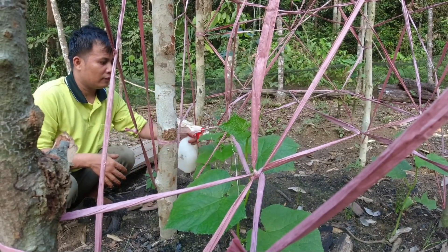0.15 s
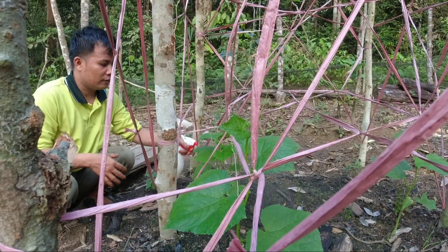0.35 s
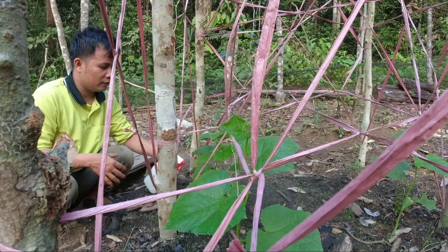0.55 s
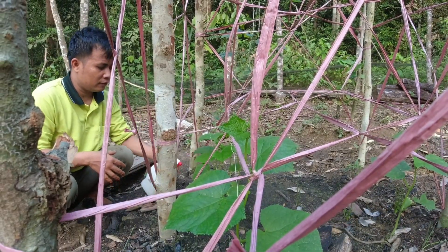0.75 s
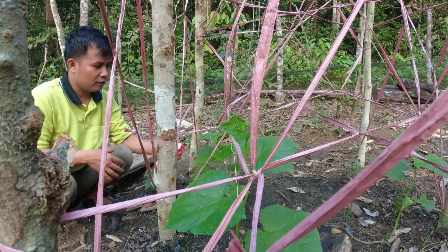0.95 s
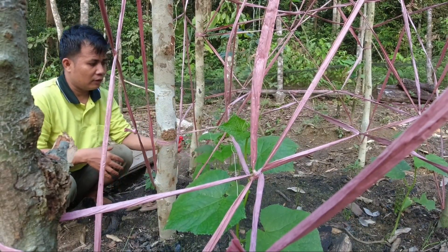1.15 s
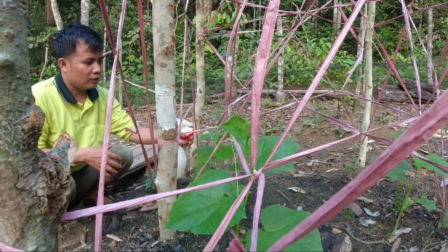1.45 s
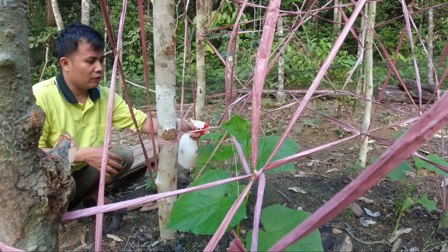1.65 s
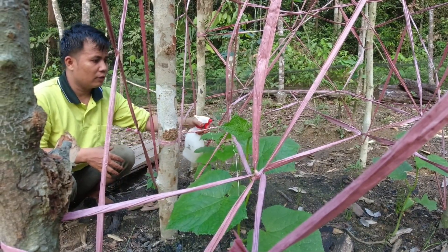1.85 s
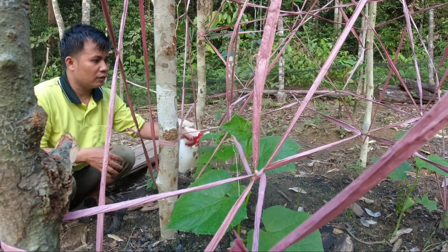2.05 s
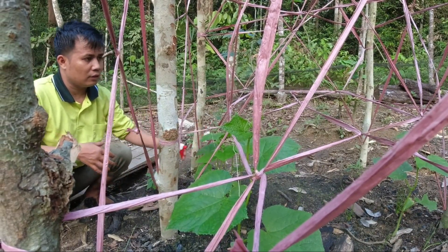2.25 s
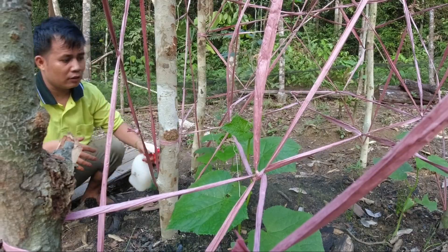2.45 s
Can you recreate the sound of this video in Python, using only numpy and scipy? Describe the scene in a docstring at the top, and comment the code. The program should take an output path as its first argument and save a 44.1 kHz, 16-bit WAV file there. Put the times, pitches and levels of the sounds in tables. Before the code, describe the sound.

A plastic hand sprayer close to the microphone gives eight short, raspy, hissing squirts at a steady quick pace, trigger clicking between them; faint insects, soft outdoor air and a low distant engine throb lie behind.

```python
"""Ticks of a plastic trigger are heard at once, over insects, garden air and the throb of a far engine.
A spray bottle is pumped eight times in a wooded garden, with ticks before, between and after the strokes.
On each stroke the piston slips and rubs, ringing the hollow pump head, and shaped noise hisses and whistles
as mist. Ticks are short rings, gurgles and a faint rustle are resonant grains; trunks and ground echo
the bottle. Insects are narrow throbbing noise, the engine is five wavering sine orders."""
import sys
import numpy as np
from scipy import signal
from scipy.io import wavfile

SR = 44100
rng = np.random.default_rng(int(sys.argv[2]) if len(sys.argv) > 2 else 0)


def ratio(d):
    """dB to gain"""
    e = np.asarray(d, float) / 20
    return 10 ** e


def wrap_up_sound(samples):
    """Save the sound to the file named by the first command line argument, as 16-bit audio."""
    columns = np.atleast_2d(samples).T
    # keep every value between -1 and 1, then stretch to whole-number steps
    tamed = np.clip(columns, -1, 1)
    steps = np.round(tamed * 32767).astype(np.int16)
    wavfile.write(sys.argv[1], SR, steps)


N = 114660


def rms_one(x):
    """Scale to rms 1."""
    return x / np.sqrt(np.mean(x ** 2) + 1e-20)


def in_time(rows):
    """Columns after the first (seconds), joined by straight lines over the scene."""
    seconds, *columns = np.transpose(rows)
    return [np.interp(np.arange(N) / SR, seconds, column) for column in columns]


def drift(rate_hz):
    """Random wander of rms 1: noise smoothed by two equal low-pass poles at rate_hz."""
    every = 40  # samples between drawn points
    settle = 2000  # points dropped while the filter settles
    r = np.exp(-2 * np.pi * rate_hz * every / SR)
    points = rng.standard_normal(N // every + settle + 2)
    slow = signal.lfilter([1], [1, -2 * r, r * r], points)[settle:]
    return np.interp(np.arange(N) / every, np.arange(len(slow)), rms_one(slow))


def resonate(x, hz, width_hz):
    """Two-pole resonance with gain of about 1 at its peak."""
    r = np.exp(-np.pi * width_hz / SR)
    feedback = [1, -2 * r * np.cos(2 * np.pi * hz / SR), r * r]
    return signal.lfilter([(1 - r * r) / 2, 0, (r * r - 1) / 2], feedback, x + 1e-18)


def twice(x, hz, width_hz):
    """The same resonance applied twice, for steeper skirts."""
    return resonate(resonate(x, hz, width_hz), hz, width_hz)


def butter(x, order, hz, kind):
    """Butterworth filter."""
    return signal.sosfilt(signal.butter(order, hz, kind, fs=SR, output="sos"), x)


def coloured(spectrum, patchy_db):
    """Third-octave bands of noise, each with its own level and flicker; rms 1."""
    out = 0
    edges = 20 * 2 ** np.arange(0, 9.9, 1 / 3)
    white = rng.standard_normal((2, N))  # neighbouring bands take separate noises
    table_hz, table_db = np.transpose(spectrum)
    for k, (low, high) in enumerate(zip(edges, edges[1:])):
        band = butter(white[k % 2], 2, [low, high], "band")
        band_db = np.interp(np.log(low * high) / 2, np.log(table_hz), table_db)
        out = out + band * ratio(band_db + patchy_db * drift(8.1))
    return rms_one(out)


# Trigger strokes close to the microphone. Each row: start in seconds, length in seconds, rasp level in dB,
# lower and upper resonance in Hz, upper over lower resonance in dB, peak of the bottle thump in dB.
PISTON_STROKES = [(0.208, 0.13, -28, 2118, 2790, -1.5, -56.5), (.49, 0.13, -27, 2174, 2610, 0, -47.5),
                  (0.767, 0.13, -30.5, 1850, 2600, -1.5, -48.5), (1.03, 0.13, -30.5, 2270, 2790, -8.5, -52),
                  (1.302, .125, -27.5, 2110, 2693, -3.5, -55.5), (1.61, 0.13, -28, 2067, 2727, -0.5, -50),
                  (1.928, 0.13, -25, 1890, 2576, 5, -58.5), (2.219, 0.11, -27, 2045, 2600, 0, -53.5)]
# Other resonances of the hollow pump head. Each row: centre in Hz, width in Hz, level in dB.
HEAD_RESONANCES = [(955, 770, -16.5), (1310, 240, -12), (1600, 450, -9), (3730, 1750, -18)]


def piston():
    """The seal slips in dense uneven jerks over a rubbing noise; the pump head rings, the bottle thumps."""
    slips_per_s, slip_spread_db = 500, 2.5
    rub_db, rasp_swell_db = 4, 1.2  # rub relative to the slips
    lower_width_hz, upper_width_hz, head_low_cut_hz = 380, 480, 760
    rise_s, fall_s, tail_s, tail_db = 0.022, 0.029, 0.074, -35
    thump_hz, thump_lead_s, thump_s = 270, 0.015, 0.008

    t, out = np.arange(N) / SR, np.zeros(N)
    slip_size = ratio(slip_spread_db * np.minimum(rng.exponential(1, N), 3))
    slip_happens = rng.random(N) < slips_per_s / SR
    slips = slip_size * rng.choice([-1, 1], N) * slip_happens
    force = rms_one(slips) + ratio(rub_db) * rng.standard_normal(N)
    force = force * ratio(rasp_swell_db * drift(45))
    for start, length, db, low_hz, high_hz, high_db, thump_db in PISTON_STROKES:
        span = slice(int((start - 0.06) * SR), int((start + length + 0.2) * SR))
        u = t[span] - start
        push_force = force[span]
        body = ratio(high_db) * twice(push_force, high_hz, upper_width_hz)
        body = body - twice(push_force, low_hz, lower_width_hz)
        for k, (hz, width_hz, head_db) in enumerate(HEAD_RESONANCES):
            body = body + (-1) ** k * ratio(head_db) * twice(push_force, hz, width_hz)
        body = butter(body, 2, head_low_cut_hz, "high")

        # S-shaped onset and release, with a faint dying tail
        rise = 1 / (1 + np.exp(-(u - rise_s / 2) / (rise_s / 4)))
        fall = 1 / (1 + np.exp((u - length + fall_s / 2) / (fall_s / 4)))
        tail = ratio(tail_db) * np.exp(-np.maximum(u - length, 0) / tail_s)
        out[span] += ratio(db) * rise * (fall + tail) * rms_one(body)

        push = np.maximum(u + thump_lead_s, 0) / thump_s
        thump_shape = np.e * push * np.exp(-push)  # crest of 1
        out[span] += ratio(thump_db) * thump_shape * np.sin(2 * np.pi * thump_hz * u)
    return out


# Spurts of mist from the nozzle. Each row: start in seconds, length in seconds, hiss level in dB,
# whistle level in dB, whistle pitch in Hz, extra treble of the hiss in dB.
MIST_SPURTS = [(0.216, 0.11, -32.5, -43.5, 8300, 0), (0.499, 0.1, -34.5, -44, 8260, 0.5),
               (0.787, 0.12, -35, -45.5, 8300, -4.5), (1.042, 0.12, -36, -39, 8090, 4),
               (1.319, 0.11, -37, -42, 8120, 3.5), (1.616, 0.13, -35, -46, 8460, -1.5),
               (1.94, 0.12, -30.5, -38.5, 8920, 5.5), (2.225, 0.1, -31.5, -45, 8570, -4)]
# Colour of the hiss. Each row: frequency in Hz, relative density in dB per Hz.
MIST_COLOUR = [(1500, 0), (3000, 20), (4500, 16.5), (6300, 15), (7300, 7), (9000, 2), (10400, -76),
               (12000, -65.5), (13500, 7.5), (15000, 15.5), (16500, -3)]


def mist():
    """Pressure builds to a crest and sags; the jet hisses brightly and whistles faintly."""
    crest_share, edge_db = 0.48, -17  # place of the crest in the spurt; level at its edges
    open_s, tail_s, whistle_width_hz = 0.014, 0.032, 1050
    bandstop_hz, bandstop_width_hz, treble_hz = 10400, 1500, 11500

    t, out = np.arange(N) / SR, np.zeros(N)
    hiss, white = coloured(MIST_COLOUR, patchy_db=3.0), rng.standard_normal(N)
    # a band-stop leaves a hole in what is heard around 10.4 kHz; it is no trait of the spray
    hole_edges = [bandstop_hz - bandstop_width_hz / 2, bandstop_hz + bandstop_width_hz / 2]
    hiss = butter(hiss, 2, hole_edges, "bandstop")
    treble = butter(hiss, 4, treble_hz, "high")
    low = butter(hiss, 4, treble_hz, "low")
    for start, length, hiss_db, whistle_db, hz, treble_db in MIST_SPURTS:
        u, crest = t - start, crest_share * length
        building = (1 - u / crest) ** 2
        sagging = ((u - crest) / (length - crest)) ** 2
        arch_db = edge_db * np.where(u < crest, building, sagging).clip(0, 1)
        gate = np.clip(u / open_s, 0, 1) * np.exp(-np.maximum(u - length, 0) / tail_s)
        spray = ratio(hiss_db + arch_db) * (low + ratio(treble_db) * treble)
        whistle = rms_one(twice(white, hz, whistle_width_hz))
        out += gate * (spray + ratio(whistle_db + 0.76 * arch_db) * whistle)
    return out


# Ticks of the trigger, close by. Each row: time of the crest in seconds, peak of the ring in dB,
# ring pitch in Hz, crack relative to the ring in dB.
TRIGGER_TICKS = [(0.0499, -34, 2336, -11), (0.11, -36.5, 2666, -9), (0.1129, -35, 2600, -6.5),
                 (0.412, -43.5, 2250, -19), (0.4745, -40, 2160, -5), (0.6834, -43.5, 2550, -13),
                 (0.6955, -43.5, 2460, -13), (0.7354, -45.5, 2845, -14), (0.9492, -42.5, 2490, -9),
                 (1.1796, -34, 2560, -4), (1.2249, -28.5, 2180, -25), (1.285, -41, 1950, -15),
                 (1.4408, -38, 2180, -2), (1.502, -29.5, 2200, -20), (1.8003, -29, 2384, -13),
                 (1.8991, -24.5, 2333, -15.5), (2.0664, -34.5, 2315, -7.5), (2.1304, -30, 2450, -16),
                 (2.388, -33, 2320, -33)]


def trigger():
    """As the trigger springs back, each tick swells into a short plastic ring with a crack and one bounce."""
    rise_s, bounce_s, bounce_db = 0.0028, 0.024, -14
    u = np.arange(int(0.04 * SR)) / SR
    out = np.zeros(N + SR)
    shape = (u / rise_s) ** 2 * np.exp(2 - 2 * u / rise_s)  # crest of 1 at rise_s
    for crest_s, db, hz, crack_db in TRIGGER_TICKS:
        crack = rms_one(twice(rng.standard_normal(len(u)), 2000, 1800))
        ring = np.sin(2 * np.pi * hz * u)
        tick = ratio(db) * shape * (ring + ratio(crack_db) * shape * crack)
        for lag_s, gain in ((0, 1), (bounce_s, ratio(bounce_db))):
            i = int((crest_s - rise_s + lag_s) * SR)
            out[i:i + len(u)] += gain * tick
    return out[:N]


# Gurgles in the bottle as the pump refills, and a faint creaking rustle in the row at 0.62 s.
# Each row: start in seconds, length in seconds, level in dB.
GURGLES_AND_RUSTLE = [(1.13, .14, -49), (2.05, .07, -52), (.34, .13, -58), (1.42, .07, -54), (.89, .1, -58),
                      (.62, .16, -57), (1.72, .13, -56), (2.32, .11, -58), (.0, .13, -58), (1.9, .04, -52),
                      (.46, .05, -52)]


def gurgle_and_rustle():
    """Small bubbles of many pitches burst as liquid is drawn up; the same grains make the faint rustle."""
    grains_per_s, low_hz, high_hz = 2500, 900, 3100
    relative_width = 0.15  # resonance width over pitch
    t = np.arange(N) / SR
    born = rng.standard_normal(N) * (rng.random(N) < grains_per_s / SR)
    pitches = np.geomspace(low_hz, high_hz, num=12)
    dealt = rng.integers(0, 12, N)  # which pitch a grain gets
    grains = sum(twice(born * (dealt == k), hz, relative_width * hz) for k, hz in enumerate(pitches))
    level = 0
    for start, length, db in GURGLES_AND_RUSTLE:
        level = level + ratio(db) * np.sin(np.pi * np.clip((t - start) / length, 0, 1))
    return rms_one(grains) * level


# Echoes off trunks and ground. Each row: delay in seconds, level in dB before the softening filter.
GARDEN_ECHOES = [(.004, -10), (.013, -17), (.027, -21), (.046, -24)]


def garden_echoes(bottle):
    """Trunks and ground return delayed copies of the bottle, with softened treble."""
    echoes = sum(ratio(db) * np.pad(bottle, (int(s * SR), 0))[:N] for s, db in GARDEN_ECHOES)
    return signal.lfilter([0.6], [1, -0.4], echoes)


# Far insect choruses. Each row: centre in Hz, width in Hz, level in dB before throbbing,
# rate of the irregular throb in Hz, throb depth from 0 to 1.
INSECT_CHORUSES = [(2600, 230, -62.5, 75, 1), (4510, 300, -60.5, 67, 0.5), (6353, 630, -60.5, 13, 0.5)]
# A nearer cricket. Each row: time in seconds, level in dB before the trill.
CRICKET_LEVEL = [(0, -54), (.2, -63), (.48, -61.5), (.52, -89), (2.05, -70), (2.09, -57), (2.2, -69),
                 (2.35, -57), (2.55, -70), (2.6, -80)]


def insects():
    """Far choruses are narrow throbbing noise; one cricket trills a thin high note."""
    cricket_hz, cricket_width_hz, pulses_per_s = 8230, 130, 55
    out = 0
    for hz, width_hz, db, rate_hz, depth in INSECT_CHORUSES:
        throb = 1 + depth * np.tanh(drift(rate_hz))
        swell = 1 + np.tanh(drift(3)) / 2
        out = out + ratio(db) * throb * swell * rms_one(twice(rng.standard_normal(N), hz, width_hz))
    phase = 2 * np.pi * np.cumsum(pulses_per_s * (1 + 0.15 * drift(1.7))) / SR
    trill = 0.7 + 0.3 * np.sin(phase)
    note = rms_one(twice(rng.standard_normal(N), cricket_hz, cricket_width_hz))
    return out + ratio(in_time(CRICKET_LEVEL)[0]) * note * trill


# The far engine. Each row: time in seconds, firing rate in Hz, rms levels of orders 2, 3 and 4 in dB.
ENGINE_ORDERS = [(0.0, 25.1, -59, -70, -60), (0.06, 24.0, -47, -72, -60), (0.11, 23.85, -51.5, -81, -51),
                 (0.34, 24.17, -58, -68, -74), (0.48, 23.78, -66, -60, -60), (0.67, 23.7, -56, -61.5, -74),
                 (0.81, 24.65, -54.5, -76, -63), (1.2, 24.95, -46, -65, -57), (1.3, 23.75, -45, -44, -46.5),
                 (1.43, 21.44, -53.5, -38.5, -42), (1.6, 22.83, -37, -50.5, -40.5),
                 (1.82, 22.51, -54, -41, -45), (2.01, 22.5, -42, -43, -48), (2.32, 20.53, -60, -47.5, -43),
                 (2.54, 21, -48.5, -49, -55), (2.6, 21.36, -64, -49, -53)]


def engine():
    """Orders 1 to 5 of a slow single-cylinder engine's firing rate, each wavering a little."""
    first_db, fifth_db, waver_db = -8.5, -10, 1  # order 1 relative to order 2, order 5 relative to order 4
    hz, second, third, fourth = in_time(ENGINE_ORDERS)
    phase = 2 * np.pi * np.cumsum(hz) / SR
    out = 0
    for order, db in enumerate((second + first_db, second, third, fourth, fourth + fifth_db), start=1):
        level = np.sqrt(2) * ratio(db + waver_db * drift(9.7))  # rms to peak
        out = out + level * np.sin(order * phase)
    return out


# Colour of the garden air. Each row: frequency in Hz, relative density in dB per Hz.
AIR_COLOUR = [(12, -32), (20, 6), (53, 6), (163, -13), (1150, -22.5), (2530, -16.5), (3340, -27),
              (4540, -30), (5380, -101), (6360, -31), (14700, -39.5), (16000, -58)]


def garden_air():
    """Broad, mostly low noise of the open garden, flickering band by band."""
    return ratio(-47) * coloured(AIR_COLOUR, patchy_db=3)


def scene():
    """The bottle close by with its echoes, then insects, engine and air behind it."""
    bottle = piston() + mist() + trigger() + gurgle_and_rustle()
    background = insects() + engine() + garden_air()
    return (bottle + garden_echoes(bottle) + background)[None]


def roll_off(x):
    """The treble ends steeply here."""
    return signal.sosfilt(signal.butter(12, 16490, fs=SR, output="sos"), x)


def record(dry):
    """The microphone's range ends steeply near 16 kHz: 60 dB down from 16150 Hz upward."""
    heard = signal.sosfilt(signal.cheby2(16, 60, 16150, fs=SR, output="sos"), dry)
    return roll_off(heard)


dry = scene()
out = record(dry)
wrap_up_sound(out)
```